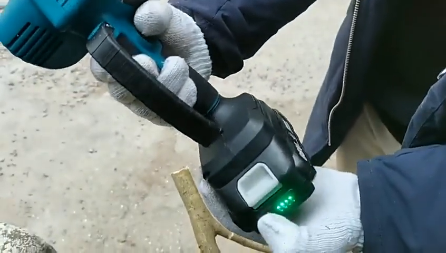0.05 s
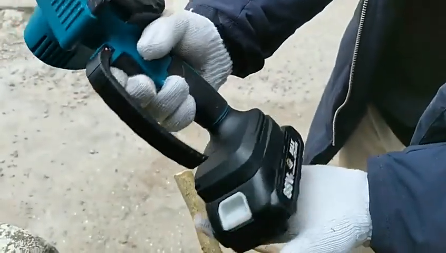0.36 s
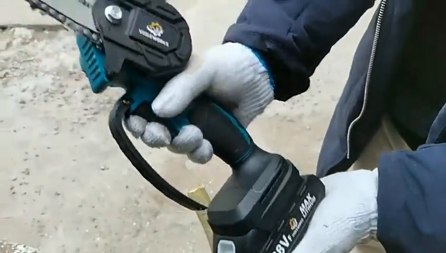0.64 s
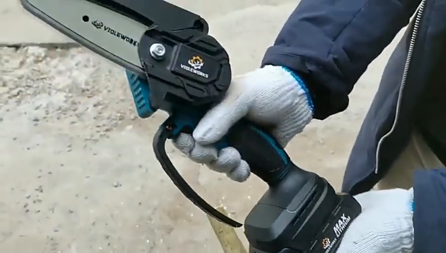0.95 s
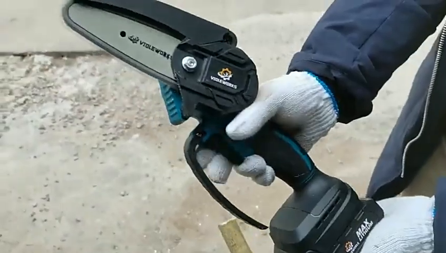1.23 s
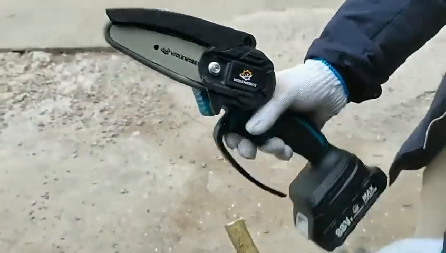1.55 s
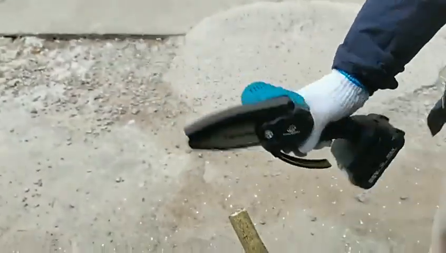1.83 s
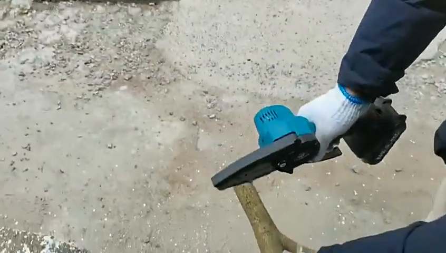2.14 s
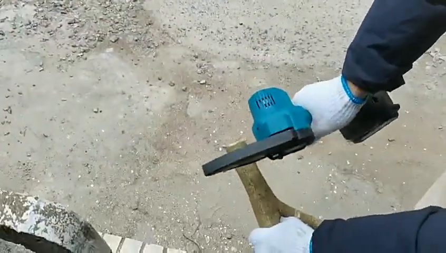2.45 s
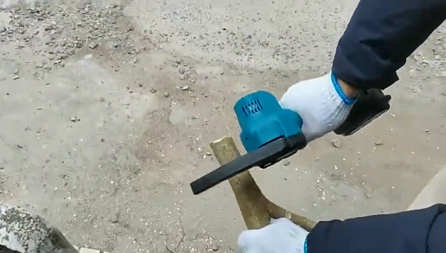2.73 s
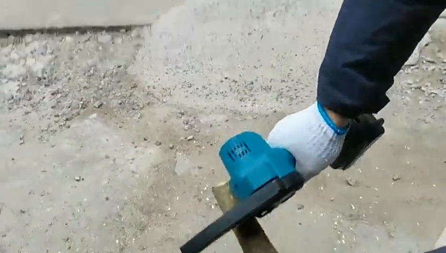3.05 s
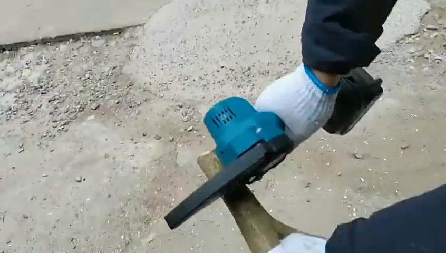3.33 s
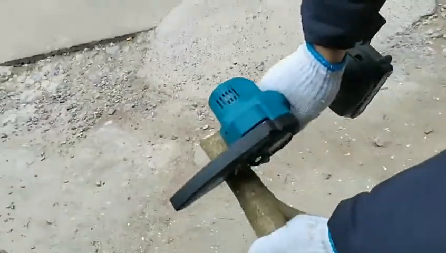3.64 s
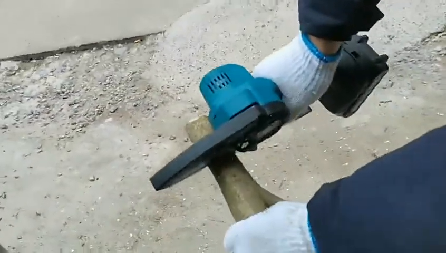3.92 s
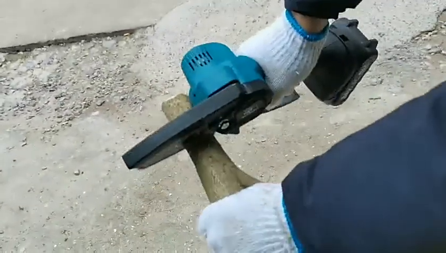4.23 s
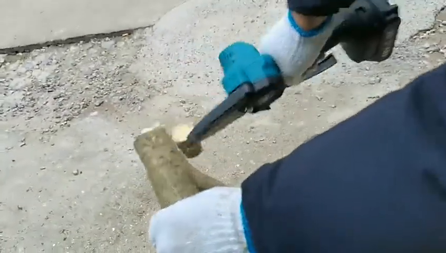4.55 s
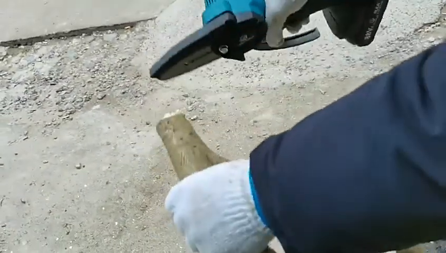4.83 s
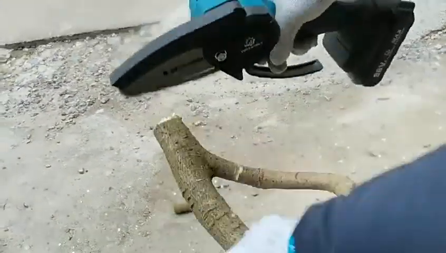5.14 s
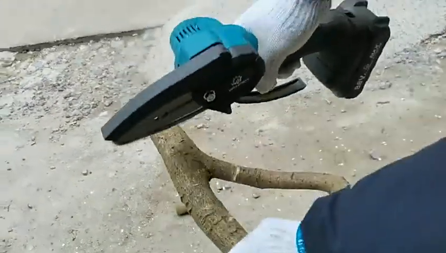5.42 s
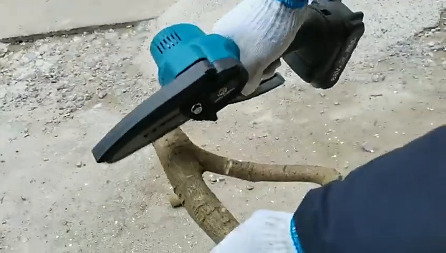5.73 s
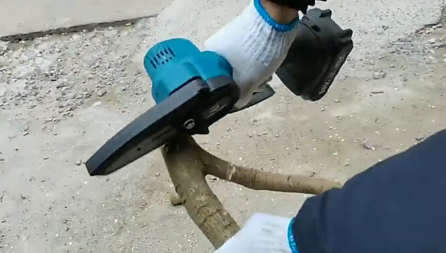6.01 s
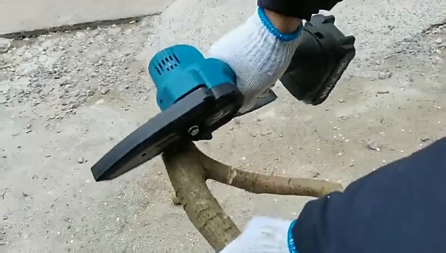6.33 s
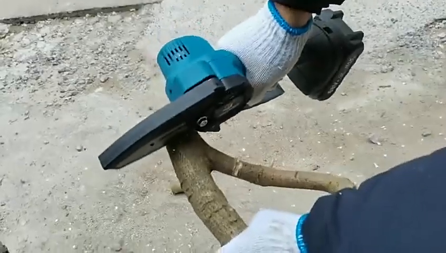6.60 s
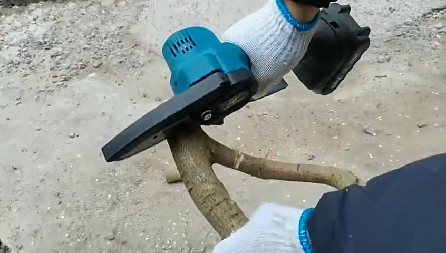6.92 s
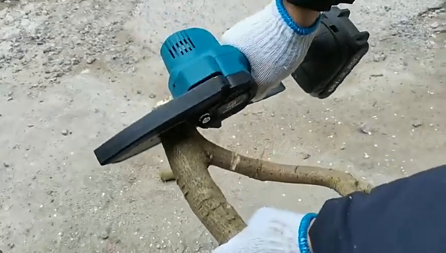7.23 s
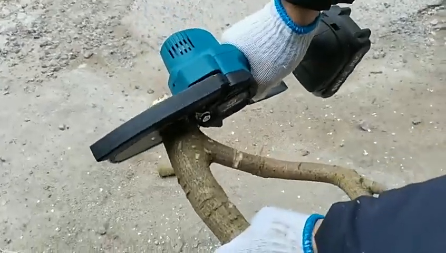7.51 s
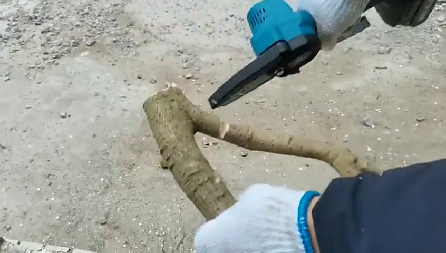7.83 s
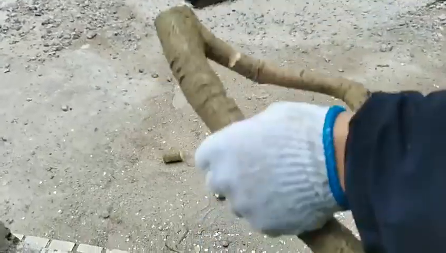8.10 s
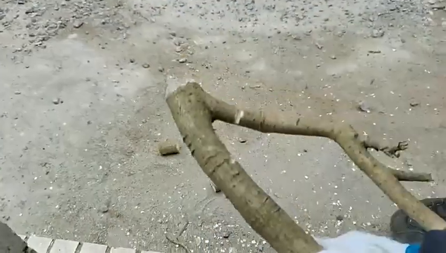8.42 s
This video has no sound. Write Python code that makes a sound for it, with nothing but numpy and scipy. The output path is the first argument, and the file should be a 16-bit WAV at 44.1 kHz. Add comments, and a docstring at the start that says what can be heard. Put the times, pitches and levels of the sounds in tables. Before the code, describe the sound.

A small cordless chainsaw starts with a snap close to the microphone, revs briefly and coasts down with a rattling chain. It starts again with a squeal and cuts into a branch, the motor whine dropping as the teeth rasp through wood. After winding down, it makes a second cut. A light wooden knock follows, and the saw starts once more. A faint outdoor rumble and hiss lie underneath.

```python
"""A low outdoor rumble and a faint hiss come first; then a small cordless chainsaw, close by, revs once, cuts
twice through a branch and starts again. One shaft speed governs the hum of the motor, the whine of the gears
and the clatter of the links, whose impacts excite resonances of steel and plastic. Under load the motor slows
while the teeth tear out chips; with the trigger released it coasts down. The chain also slaps and clinks, thin
high tones sing, wood knocks lightly, and the concrete ground adds one short reflection."""
import sys
import numpy as np
from scipy import signal
from scipy.fft import rfft, irfft
from scipy.io import wavfile
from scipy.ndimage import uniform_filter1d

SR = 44100
rng = np.random.default_rng(int(sys.argv[2]) if len(sys.argv) > 2 else 0)


def log_audio(samples):
    """Write samples as a 16-bit WAV file to the path given in sys.argv[1]."""
    # one column per channel
    frames = np.atleast_2d(samples).T
    # limit to full scale, then quantise
    limited = np.clip(frames, -1, 1)
    pcm = np.round(limited * 32767).astype(np.int16)
    wavfile.write(sys.argv[1], SR, pcm)


N = 381906
TIME = np.arange(N) / SR
FREQ = np.maximum(np.arange(N // 2 + 1) * SR / N, 1)

# Envelopes of the background. Each row: time in seconds, relative level in dB.
RUMBLE_LEVEL = [(.5, -26), (.8, -35), (1.4, -33), (3.2, -33), (4.0, -42.5), (5.0, -36.5), (6.1, -33),
                (6.8, -42.5), (8.66, -32)]
HISS_LEVEL = [(.55, -38.5), (2.25, -42), (8.1, -45.5), (8.66, -47)]
# Partials of a distant hum. Each row: frequency in Hz, level in dB.
DISTANT_HUM = [(49, -79), (98, -59.5), (150, -61.5)]
# A faint tone after the last cut. One row: start and end in seconds, frequency in Hz, level in dB.
LINGERING_TONE = (7.5, 8.2, 372, -60)
# Spectral envelopes of the noises. Each row: frequency in Hz, relative gain in dB.
RUMBLE_SPECTRUM = [(20, -47), (45, 13.5), (80, 2.5), (150, 2), (250, -9.5), (400, -15), (1500, -105)]
HISS_SPECTRUM = [(300, -9.5), (900, -13), (1400, -5), (2000, -8.5), (3300, -6), (4200, 4.5), (6000, -1),
                 (8000, -23.5), (15000, -26)]
CHAIN_SPECTRUM = [(300, -62), (600, -38), (1500, -1), (2800, 2.5), (6100, 3), (7300, -6), (8600, -18),
                  (12000, -6)]
SIZZLE_SPECTRUM = [(7000, -52), (8700, -23), (9800, 8), (15500, -5.5)]
SLAP_SPECTRUM = [(400, -25), (2200, 3.5), (5500, -3.5), (8500, -15.5), (11000, -13)]
WOOD_SPECTRUM = [(100, -8), (220, -4.5), (460, -11), (620, 2), (800, 6), (950, 0), (2000, 0.5), (6000, 11),
                 (8500, -13.5), (11000, -4.5), (15000, -2)]

# Pulls of the trigger. Each row: press, release and coasting time in seconds, saw level in dB, exponent
# of its fall with speed, then in relative dB: housing ring, whine at release, its gain towards rest,
# gain of its overtones while coasting, slap of the chain jerking taut.
PULLS = [ (.5845, 1.065, 1.265, -18.7, 1.6, -8.5, -26.5, 39, -4, 6),
         (2.340, 4.5, 1.5, -21, .95, -7, -23, 22, -2, -9),
         (5.239, 7.541, .51, -21.7, 1.09, -9.5, -11, 7, 6, -4),
         (8.453, 8.7, 1.3, -23, 1.24, -13, -22, 22, 0, 1), ]
# Cuts. Each row: bite and breakthrough in seconds, wood level in dB, relative growl in dB, change of
# saw level once free in dB, shaft speed still lost once free in Hz.
CUTS = [(2.685, 4.259, -37.5, -11.5, -7, 10), (5.625, 7.323, -38, -8, -5, 36)]
# The loaded motor, one table a cut. Each row: time in seconds, shaft speed in Hz, relative whine in dB.
UNDER_LOAD = [
    [(2.76, 318, -22), (2.88, 308, -12), (3.07, 286, -13), (3.26, 276, -11), (3.35, 267, -3),
     (3.47, 213, -4), (3.6, 216, -7), (3.75, 212, -16), (3.82, 201, -6), (4.06, 219, -9), (4.25, 208, -12)],
    [(5.76, 298, -20), (5.85, 288, -6), (5.93, 281, -3), (6.08, 259, -10), (6.22, 261, -9), (6.39, 240, -9),
     (6.49, 213, -4), (6.57, 234, -9), (6.78, 259, -14), (6.85, 231, -11), (7.02, 240, -17),
     (7.31, 210, -13)],
]
# The chain hops in the kerf. One row: time and half length in seconds, fraction of the load lost.
HOP = (5.8, .02, .9)

# Modes of chain and sprocket, shifting with tension. Each row: time in seconds, three centres in Hz.
STEEL_MODES = [(1.0, 3340, 4430, 5280), (2.45, 2700, 4190, 5560), (3.1, 2905, 4460, 5250),
               (4.0, 3070, 4670, 5360), (4.6, 3590, 4390, 5470), (6.9, 3085, 4720, 5050),
               (7.5, 3600, 4500, 5360), (8.5, 3100, 4270, 5730)]
# The guide bar's mode, wandering as the saw turns and the chain slackens.
# Each row: time in seconds, centre in Hz, relative level in dB.
BAR_MODE = [(.6, 2090, -8.5), (1.3, 2100, -4), (1.7, 2330, -2.5), (2.1, 2500, 4), (2.34, 2160, -8),
            (4.45, 2110, -8.5), (4.75, 1970, -11), (4.92, 1630, -8.5), (5.6, 1924, -12.5),
            (7.3, 2120, -5.5), (7.45, 2160, -15), (8.45, 2410, -4)]
# Modes of motor shell, plastic housing, bending branch, chain link and knocked wood.
# Each row: centre in Hz, bandwidth in Hz, relative gain in dB.
SHELL_MODES = [(795, 58, 0)]
HOUSING_MODES = [(1090, 124, -5), (1373, 120, -1), (1523, 110, -3)]
BRANCH_MODES = [(268, 193, 0)]
LINK_MODES = [(3930, 260, -13), (4270, 350, -15.5), (5070, 240, -12)]
STICK_MODES = [(1240, 110, -11), (1470, 280, 8)]
# Gear mesh tones. Each row: multiple of the shaft speed, relative level in dB.
MESH_ORDERS = [(14, 0), (28, 0), (42, -10)]
# Radiation of those tones by the casing. Each row: frequency in Hz, gain in dB.
CASING_RESPONSE = [(950, -30), (1170, 2), (1500, 4), (2100, -3), (3000, 3), (4600, 3), (5450, 4),
                   (6100, -30)]

# High tones, each on an arch of pitch. Each row: midpoint and half length in seconds, top pitch in Hz, #
# fractional fall of pitch at the ends, level in dB.
HIGH_TONES = [(1.66, .13, 4520, .06, -33.5), (2.84, .32, 4620, .24, -26.5), (4.9, .3, 5350, 0, -38),
              (7.49, .14, 5550, .15, -32), (7.55, .22, 6300, .02, -41)]
# Single impacts. Each row: start in seconds, relative level in dB.
SLAPS = [(1.157, -9), (1.252, -3), (1.455, -8)]
SNAGS = [(2.675, -9), (3.479, -9), (5.619, -10), (5.777, -8), (7.246, -11), (7.271, -11)]
CLINKS = [(4.371, 4), (4.834, -11), (5.090, -12), (7.385, -7)]
TICKS = [(8.095, -37), (8.171, -43)]
KNOCKS = [(8.1195, -41), (8.3958, -58)]

# Direction of the saw. Each row: time in seconds, left minus right in dB.
PAN = [(1.7, 4), (7.0, 1.5), (7.6, -1)]
# Balance of the two microphone ports. Each row: frequency in Hz, left minus right in dB.
PORT_BALANCE = [(60, 6.5), (450, 0), (1350, 5.5), (1750, 0.5), (2150, 10), (2900, -7.5), (3500, -2.5),
                (5800, -12.5), (9000, 7), (14000, 0)]
# Their coherence. Each row: frequency in Hz, coherence from 0 to 1.
PORT_COHERENCE = [(130, 0.57), (350, 0.87), (1000, 0.97), (2200, 0.99), (4500, 0.69), (8000, 0.35)]
# Their relative phase. Each row: frequency in Hz, lead of the left in radians.
PORT_PHASE = [(500, 0.56), (1400, 1.05), (1850, 1.9), (2300, 0.97), (3100, 1.84), (7000, 1.59)]

FREE_HZ = 436.6  # shaft speed with no load
SPIN_S, DRAG_S = .042, .9  # time constants under power and coasting
STEEL_DB, STEEL_WIDTH_HZ, BAR_WIDTH_HZ = [-9, -10, -8], 310, 355
SHELL_DB, SHELL_FREED_DB = -24, 3.5  # relative shell ring, and its gain once out of the wood
TAUT_DB, WHINE_FREE_DB = 2.5, -21  # gain of the saw under load; relative whine without load
SAW_SINK_DB, HOUSING_SINK_DB, GROWL_SINK_DB = -3, -7, 5  # changes as the bar sinks through the branch
BREAK_DB, BREAK_S = 3, 0.22  # the last fibres tear louder: gain and time constant


def undb(db):
    """Amplitude ratio of a level in decibels."""
    return 10 ** (np.asarray(db) / 20)


def unit(x):
    """Normalisation to an rms of 1."""
    return x / np.sqrt(np.mean(x ** 2) + 1e-18)


def curve(rows, column=1):
    """Linear interpolation of one column over time."""
    rows = np.array(rows)
    return np.interp(TIME, rows[:, 0], rows[:, column])


def latest(rows):
    """Sample and hold: the columns of the event that began last, or of the first before any has."""
    rows = np.array(rows)
    return rows[np.maximum(np.searchsorted(rows[:, 0], TIME) - 1, 0)].T


def spectrum(points):
    """Linear interpolation over log frequency."""
    hz, value = np.transpose(points)
    return np.interp(np.log(FREQ), np.log(hz), value)


def colour(x, points):
    """Zero-phase filtering by a spectral envelope."""
    return irfft(rfft(x) * undb(spectrum(points)), N)


def noise():
    """Two uncorrelated channels of white noise."""
    return rng.standard_normal((2, N))


def walk(rate_hz):
    """Smooth random fluctuation with an rms of 1."""
    step = max(int(SR / rate_hz), 1)
    held = np.repeat(rng.standard_normal(N // step + 1), step)
    return unit(uniform_filter1d(held, step)[:N])


def ring(x, modes):
    """Modal superposition: damped resonances add with alternating sign."""
    response = sum((-1) ** k * undb(db) / (1 + 1j * (FREQ / hz - hz / FREQ) * hz / width)
                   for k, (hz, width, db) in enumerate(modes))
    return irfft(rfft(x) * response, N)


def moving_ring(force, hz, width_hz):
    """Forced resonance: a noisy force passes through a band whose centre moves."""
    carrier = np.exp(2j * np.pi * np.cumsum(hz) / SR)
    lowpass = signal.butter(2, width_hz / 2, fs=SR, output="sos")
    return unit(np.real(carrier * signal.sosfilt(lowpass, force * noise() / carrier)))


def fade(x, seconds):
    """Exponential decay of every impulse."""
    return signal.lfilter([1], [1, -np.exp(-1 / (SR * seconds))], x)


def settle(start, seconds):
    """First-order step response, rising from 0 towards 1."""
    return 1 - np.exp(-np.maximum(TIME - start, 0) / seconds)


def during(start, end, edge_s):
    """Trapezoidal window: 1 from start to end, with ramps outside."""
    return np.clip(1 + np.minimum(TIME - start, end - TIME) / edge_s, 0, 1)


def impacts(hz, scatter_db, decay_s):
    """Envelope of a train of decaying impulses, irregular in timing and size."""
    count = np.cumsum(hz * np.exp(.35 * walk(500))) / SR
    size = undb(scatter_db * np.clip(rng.standard_normal(N), -2.2, 2.2))
    return unit(fade(np.diff(np.floor(count), prepend=0) * size, decay_s))


def bursts(events, decay_s, rise_s=0.00025):
    """Transient excitation: one short noise burst for each event."""
    hits = np.zeros(N)
    for start, db in events:
        hits[int(start * SR)] = undb(db)
    return (fade(hits, decay_s) - fade(hits, rise_s)) * noise()


def outdoors():
    """Ambient noise: rumble, hiss, a distant hum and a faint late tone add by superposition."""
    rumble = unit(colour(noise(), RUMBLE_SPECTRUM)) * undb(curve(RUMBLE_LEVEL) - 9.5 + 2.1 * walk(20))
    hiss = unit(colour(noise(), HISS_SPECTRUM)) * undb(curve(HISS_LEVEL) + walk(28))
    hum = sum(undb(db + 2 * walk(1.75)) * np.sqrt(2) * np.sin(2 * np.pi * hz * TIME + .5 * walk(1.87))
              for hz, db in DISTANT_HUM)
    start, end, tone_hz, tone_db = LINGERING_TONE
    tone = during(start, end, 0.25) * undb(tone_db + 2 * walk(12)) * np.sin(2 * np.pi * tone_hz * TIME)
    return rumble + hiss + np.outer([1, 0], hum + tone)


def drive():
    """Inertia delays each change: gives shaft speed in Hz, fraction spun up, fraction left in coasting."""
    pressed, released, coast_s = latest(PULLS)[:3]
    spun = settle(pressed, SPIN_S)
    remaining = np.clip(1 - settle(released, DRAG_S) / (1 - np.exp(-coast_s / DRAG_S)), 0, 1)
    speed = FREE_HZ
    for (bite, through, *_, lost_hz), loaded in zip(CUTS, UNDER_LOAD):
        bogged, recovered = settle(bite, SPIN_S), settle(through, SPIN_S)
        droop_hz = (bogged - recovered) * (FREE_HZ - curve(loaded))
        speed = speed - droop_hz - recovered * lost_hz * (bite > pressed)
    return speed * spun * remaining, spun, remaining


def grip():
    """Mechanical load of the wood on the teeth, from 0 to 1; it dips when the chain hops."""
    bite, through = latest(CUTS)[:2]
    hop_s, half_s, lost = HOP
    return during(bite, through, edge_s=0.036) * (1 - lost * np.exp(-((TIME - hop_s) / half_s) ** 2))


def chain(speed, shell_gain, housing_gain, links_per_turn=.6, friction=1.0):
    """Impact and friction: links strike the sprocket and slide, so steel, bar, shell and housing ring."""
    blows = impacts(links_per_turn * speed + 60, scatter_db=3.5, decay_s=0.0024)
    blows = blows / np.sqrt(uniform_filter1d(blows ** 2, SR // 16) + 1e-6)  # even power at any speed
    loose_hits = impacts(np.full(N, 70.), scatter_db=15, decay_s=0.0074)
    rattle = 2 * np.tanh(loose_hits / 2) * np.exp(-speed / 260)  # a slow chain sags and rattles
    force = unit(np.sqrt(friction ** 2 + blows ** 2 + rattle ** 2))
    clatter = undb(1) * unit(colour(force * noise(), CHAIN_SPECTRUM))
    sizzle = undb(-11.5) * unit(colour((blows + 1.2) * noise(), SIZZLE_SPECTRUM))
    steel = 0
    for column, db in enumerate(STEEL_DB, start=1):
        centre_hz = curve(STEEL_MODES, column) * (1 + .018 * walk(9))
        steel += undb(db) * moving_ring(force + rattle, centre_hz, STEEL_WIDTH_HZ)
    shell = shell_gain * unit(ring(force * noise(), SHELL_MODES))
    bar = undb(curve(BAR_MODE, column=2)) * moving_ring(force, curve(BAR_MODE), BAR_WIDTH_HZ)
    housing = undb(-4.5) * housing_gain * unit(ring(force * noise(), HOUSING_MODES))
    return clatter + sizzle + steel + bar + housing + shell


def motor(speed, load, whine_db, overtone_db):
    """Periodic forcing: the shaft hums, and gear tones swell as they cross resonances of the casing."""
    angle = 2 * np.pi * np.cumsum(speed * (1 + 0.004 * walk(60))) / SR
    hum = np.clip(speed / 440, 0, 1) ** 4 * np.sin(angle) * undb(-25.5 + 2 * walk(60) - 10 * load)
    whine = 0
    for k, (order, db) in enumerate(MESH_ORDERS):
        casing_db = np.interp(order * speed, *np.transpose(CASING_RESPONSE))
        radiated = undb(db + overtone_db * (k > 0) + casing_db + 2.4 * walk(110))
        backlash = (.42 + speed / 420) * (.65 * walk(600) + walk(110))  # tooth play broadens the line
        contact = np.clip(speed / 230 + .6 + .4 * walk(70), 0, 1)  # slow gears lose touch
        damping = 1 + 4 * k * load
        whine += contact * radiated * np.sin(order * angle + backlash) / damping
    return hum + whine * undb(whine_db)


def saw(speed, spun, remaining):
    """Radiation follows speed and load: chain and motor are louder taut and fade as they coast."""
    pressed, released, _, saw_db, exponent, housing_db, release_db, slow_db, overtone_db, _ = latest(PULLS)
    bite, through, _, _, freed_db, _ = latest(CUTS)
    load = grip()
    depth = np.clip((TIME - bite) / (through - bite), 0, 1) * (bite > pressed)
    freed = depth * (1 - load)
    level_db = saw_db + load * (TAUT_DB + SAW_SINK_DB * depth) + freed * freed_db
    level = undb(level_db) * spun ** 0.32 * remaining ** exponent
    powered_db = WHINE_FREE_DB + load * (curve(np.vstack(UNDER_LOAD), column=2) - WHINE_FREE_DB)
    whine_db = np.where(TIME < released, powered_db, release_db + slow_db * (1 - remaining) ** 2)
    shell_gain = undb(SHELL_DB + SHELL_FREED_DB * freed)
    housing_gain = undb(housing_db + HOUSING_SINK_DB * depth)
    clatter = chain(speed, shell_gain, housing_gain)
    return level * (clatter + motor(speed, load, whine_db, overtone_db * (TIME > released)))


def slaps(take_up_s=0.0025):
    """Impact noise: the chain jerks taut just after each press, and strikes the bar when slack."""
    jerks = [(pressed + take_up_s, db) for pressed, *_, db in PULLS]
    taut = bursts(jerks, decay_s=0.0023, rise_s=0.0006)
    slack = bursts(SLAPS, decay_s=0.013, rise_s=0.0021)
    return undb(-5) * colour(taut + slack, SLAP_SPECTRUM)


def high_tones():
    """Thin high tones sing roughly, mostly on an arch of pitch."""
    out = 0
    for middle, half, hz, sag, db in HIGH_TONES:
        arch = np.minimum(((TIME - middle) / half) ** 2, 1)
        pitch = hz * (1 - sag * arch + .028 * walk(700))
        out += undb(db + 2 * walk(90)) * (1 - arch ** 3) * np.sin(2 * np.pi * np.cumsum(pitch) / SR)
    return out


def snags():
    """A brief force has a broad spectrum: a tooth catches in the wood with a click."""
    return colour(bursts(SNAGS, decay_s=0.0034), CHAIN_SPECTRUM)


def cutting(speed, teeth_per_turn=.3):
    """Fracture noise: each tooth tears out a chip with a rasp, and the branch's bending mode growls."""
    bite, through, wood_db, branch_db = latest(CUTS)[:4]
    growl_db = branch_db + GROWL_SINK_DB * np.clip((TIME - bite) / (through - bite), 0, 1)
    feed = grip() * undb(wood_db + BREAK_DB * np.exp(-np.abs(through - TIME) / BREAK_S))
    tearing = impacts(teeth_per_turn * speed + 20, scatter_db=5, decay_s=0.011) + 0.45
    rasp = undb(15.5) * unit(colour(tearing * noise(), WOOD_SPECTRUM))
    growl = undb(growl_db) * unit(ring(ring(tearing * noise(), BRANCH_MODES), BRANCH_MODES))
    return feed * (rasp + growl)


def clinks():
    """Impact excites the high modes of a steel link."""
    return undb(14) * ring(bursts(CLINKS, decay_s=.006), LINK_MODES)


def ticks():
    """Two small ticks, bright because differentiation favours high frequencies."""
    return undb(8) * np.diff(bursts(TICKS, decay_s=0.00056, rise_s=0.00027), prepend=0)


def wood_knocks():
    """Light impacts excite the strongly damped modes of the cut wood."""
    blows = bursts(KNOCKS, decay_s=0.0074, rise_s=0.0025)
    return undb(14.5) * ring(ring(blows, STICK_MODES), STICK_MODES)


def ground_echo(x, lag_s=.0035, reflection=0.32):
    """Comb filtering: the concrete reflects a copy whose delay drifts as the saw moves."""
    late = TIME - lag_s * (1 + 0.126 * walk(1.5))
    return x + reflection * np.array([np.interp(late, TIME, side) for side in x])


def ports(x):
    """Partial coherence: two microphone ports hear the midrange most alike, the top treble least."""
    shared, own = rfft(x)
    coherence = spectrum(PORT_COHERENCE)
    right = (coherence * shared + np.sqrt(1 - coherence ** 2) * own) * np.exp(-1j * spectrum(PORT_PHASE))
    lean = undb(spectrum(PORT_BALANCE))
    return irfft(np.array([lean * shared, right]) * np.sqrt(2 / (1 + lean ** 2)), N)


def scene():
    """Superposition at the ports of saw, branch, ground reflection and background."""
    speed, spun, remaining = drive()
    direct = saw(speed, spun, remaining) + high_tones() + cutting(speed)
    direct += slaps() + snags() + clinks() + wood_knocks() + ticks()
    near = undb(2) * ground_echo(direct)
    return ports(near) * undb(np.outer([.5, -.5], curve(PAN))) + ports(outdoors())


def record(dry, ceiling=.85, top_hz=15500):
    """Soft saturation rounds the tallest peaks, and a steep low-pass limits the bandwidth."""
    rounded = dry / (1 + (dry / ceiling) ** 4) ** .25
    return signal.sosfilt(signal.ellip(10, .2, 80, top_hz, fs=SR, output="sos"), rounded)


dry = scene()
out = record(dry)
log_audio(out)
```